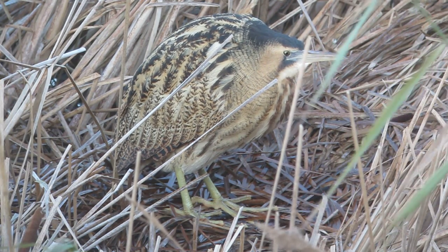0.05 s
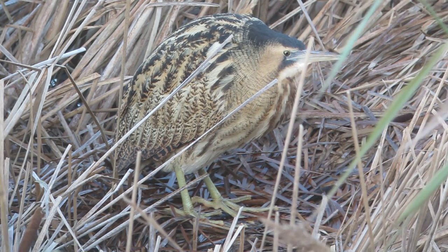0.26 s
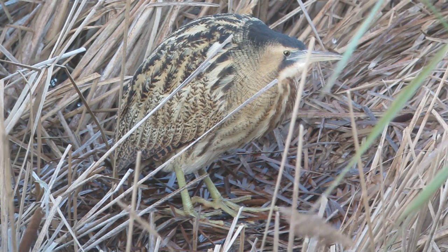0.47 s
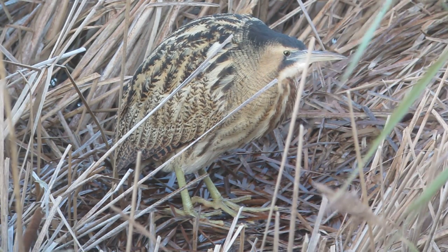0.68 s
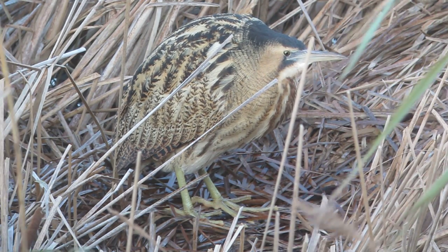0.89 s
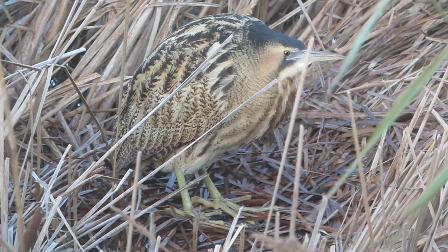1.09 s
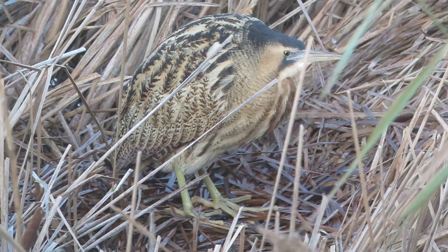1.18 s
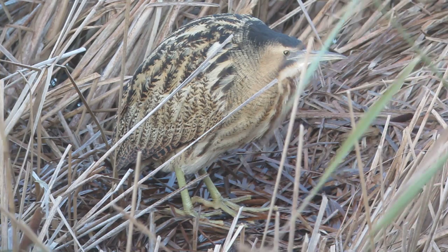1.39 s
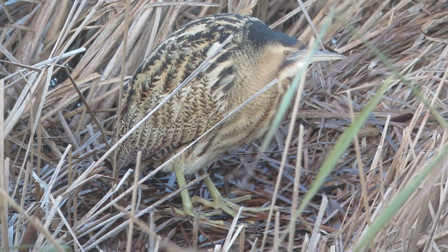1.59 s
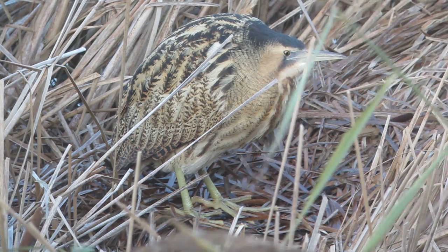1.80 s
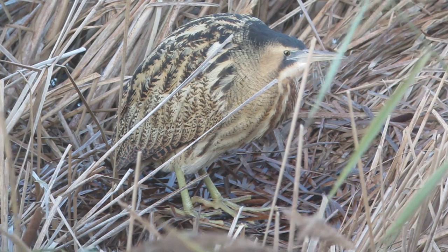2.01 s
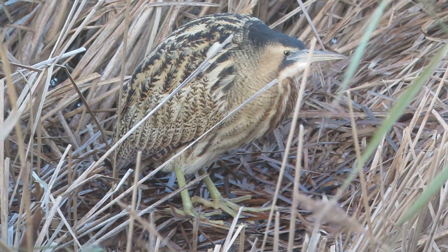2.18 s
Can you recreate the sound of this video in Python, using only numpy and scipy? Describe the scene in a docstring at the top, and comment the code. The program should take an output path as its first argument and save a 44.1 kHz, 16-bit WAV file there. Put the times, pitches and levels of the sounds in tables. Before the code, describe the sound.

Wind gusts buffet the microphone with a low rumble and soft thumps, mostly on the right, then die down. Behind them a reed bed hisses faintly, with light rustles of dry leaves and a few tiny stem ticks.

```python
"""Gusts in a reed bed buffet the two ports of a camera microphone, mostly the right one, then die down.
Their turbulent pressure is heard as a low rumble, single eddies as thumps. Behind it far wind murmurs
and the reeds hiss; dry leaves brush and squeak by friction, stems tick in their high modes, and a thin
far whistle sounds at the end. The recorder whines faintly, just above a narrow notch in its treble."""
import sys
import numpy as np
from scipy.fft import rfft, irfft, next_fast_len
from scipy.io import wavfile
from scipy.ndimage import uniform_filter1d, map_coordinates

SR = 44100
rng = np.random.default_rng(int(sys.argv[2]) if len(sys.argv) > 2 else 0)


def inscribe(sig):
    """Save sig as 16-bit PCM at rate SR to the path in sys.argv[1].

    A 1-D sig is mono; a 2-D sig holds one channel per row.
    Samples are clipped to [-1, 1] before scaling.
    """
    pcm = np.round(np.clip(np.atleast_2d(sig).T, -1, 1) * 32767)
    wavfile.write(sys.argv[1], SR, pcm.astype(np.int16))


N = 99225
LEAF_COHERENCE = 0.25  # between left and right


def amp(db):
    """Amplitude ratio of a level in decibels."""
    return 10 ** (np.asarray(db) / 20)


def unit(x):
    """Normalisation to rms 1."""
    return x / np.sqrt(np.mean(x ** 2) + 1e-20)


def along(points, hz):
    """Interpolation of (f/Hz, value) points on a logarithmic frequency axis."""
    f, values = np.transpose(points)
    return np.interp(np.log(hz + 1), np.log(f + 1), values)


def clock():
    """Sample times t/s."""
    return np.arange(N) / SR


def curve(points):
    """Linear interpolation of (t/s, value) points."""
    return np.interp(clock(), *np.transpose(points))


def wobble(rate):
    """Smooth random modulation: a spline through `rate` Gaussian values a second."""
    return map_coordinates(rng.standard_normal(N // 8), [clock() * rate], mode="wrap")


def filtered(x, response):
    """Linear filtering: the spectrum is multiplied by a frequency response."""
    size = next_fast_len(N + SR // 2)
    return irfft(rfft(x, size) * response(np.fft.rfftfreq(size, 1 / SR)), size)[..., :N]


def noise(gain, coherence, left_db=0):
    """Partly coherent stereo noise of rms 1; coherence is a number or (f/Hz, value) points."""
    def mid_side_gain(hz):
        correlation = along(coherence, hz) if np.ndim(coherence) else np.full_like(hz, coherence)
        angle = np.arccos(np.clip(correlation, -1, 1)) / 2
        return gain(hz) * [np.cos(angle), np.sin(angle)]
    mid, side = filtered(rng.standard_normal((2, N)), mid_side_gain)
    return unit(np.array([(mid + side) * amp(left_db), mid - side]))


def colour(points):
    """Frequency response through (f/Hz, level/dB) points."""
    return lambda hz: amp(along(points, hz))


def resonant(modes):
    """Modal response: a sum of Lorentzian peaks (f/Hz, width/Hz, level/dB)."""
    return lambda hz: sum(amp(db) / (1 + (2 * (hz - centre) / width) ** 2) for centre, width, db in modes)


def swell(peak_s, rise_s, fall_s):
    """Exponential growth to a peak, then exponential decay."""
    t = clock() - peak_s
    return np.exp(-np.maximum(-t / rise_s, t / fall_s))


def marsh_wind():
    """Distant turbulence murmurs; its coherence between the ports falls with frequency."""
    # strength of the murmur (t/s, level/dB)
    levels = [(0, -53), (1.2, -54), (1.8, -52), (2.25, -49.5)]
    # its spectrum (f/Hz, relative level/dB)
    spectrum = [(12, -28), (30, 0.5), (60, 3), (90, -3.5), (130, -2.5), (185, -5.5), (265, -5), (450, -12),
                (800, -15.5), (1500, -23.5), (3000, -36), (8000, -72)]
    # likeness of left and right (f/Hz, coherence)
    coherence = [(50, 1), (300, 0.76), (800, 0.76), (2000, 0.36)]
    return noise(colour(spectrum), coherence) * amp(curve(levels) + 0.41 * wobble(13.3))


def reed_hiss():
    """The reeds hiss as broadband noise, almost incoherent between the ports."""
    # spectrum of the hiss (f/Hz, relative level/dB)
    spectrum = [(100, -1), (1000, 1.5), (2000, -.5), (3200, -1.5), (5000, -4), (7000, -5), (9200, -2),
                (10300, 0.5), (11800, -4), (15500, -8.5)]
    # its nearly even strength (t/s, level/dB)
    levels = [(0, -55), (.3, -53.5), (1.0, -54.5), (1.5, -54.5), (2.25, -54.5)]
    return noise(colour(spectrum), coherence=0.03, left_db=1.7) * amp(curve(levels))


def far_whistle():
    """One note, perhaps a bird's, is modulated in frequency and amplitude on its way through the wind."""
    start_s, end_s, fade_s = 2.025, 2.24, 0.014
    gate = np.clip(np.minimum(clock() - start_s, end_s - clock()) / fade_s, 0, 1)
    pitch_hz = 1745 + 61.4 * wobble(240)
    note = np.sin(2 * np.pi * np.cumsum(pitch_hz) / SR)
    flutter_db = 4 * np.array([wobble(60), wobble(60)])
    return amp(-63) * gate * unit(note * amp(flutter_db))


def leaf_squeak():
    """Sliding friction makes one leaf ring faintly at two resonances."""
    # leaf resonances (f/Hz, width/Hz, relative level/dB)
    modes = [(3580, 540, -1), (7000, 280, -5)]
    return amp(-56) * swell(0.568, rise_s=0.027, fall_s=0.021) * noise(resonant(modes), LEAF_COHERENCE)


def stem_ticks():
    """Brief slips excite the high modes of dry stems, which decay exponentially."""
    # slips (t/s, level/dB, relative level of the upper modes/dB)
    ticks = [(.315, -52.5, -14), (1.099, -40, -26), (1.119, -51, -16), (1.459, -46, -4), (1.478, -56, -7),
             (1.555, -77, -3), (1.655, -54, -21)]
    # stem resonances, lower and upper group (f/Hz, width/Hz, relative level/dB)
    lower_modes = [(10110, 240, 5), (10440, 240, -15), (10800, 600, -5)]
    upper_modes = [(14480, 100, -3), (15010, 200, -4)]
    lower = noise(resonant(lower_modes), coherence=0.36, left_db=4.5)
    upper = noise(resonant(upper_modes), coherence=0.36, left_db=4.5)
    return sum(amp(db) * swell(peak_s, rise_s=0.0025, fall_s=0.0092) * (lower + amp(upper_db) * upper)
               for peak_s, db, upper_db in ticks)


def leaf_rustle():
    """Friction noise swells with each brush, with a fine crinkle above and a low thud below."""
    # brushes (t/s, level/dB, rise/s, fall/s, relative crinkle level/dB, relative thud level/dB)
    brushes = [(.402, -53.5, 0.0067, .009, -6, -20), (.555, -55, 0.035, .025, -18, -21),
               (.59, -62, .02, .035, 7, -20), (.815, -54, 0.019, 0.023, -18, -20),
               (1.108, -46, 0.015, 0.033, -3, -5.5), (1.36, -55.5, .04, 0.082, -11, -4.5),
               (1.468, -54.5, 0.021, 0.032, -3, -18), (1.555, -55, 0.023, 0.048, -8, -6),
               (1.844, -47.5, .02, 0.024, -4, -2.5), (1.95, -59.5, 0.028, .04, -15, -12)]
    # spectra of the friction and the crinkle (f/Hz, relative level/dB)
    friction_spectrum = [(300, 3.5), (700, -3), (1400, 1), (2000, -1.5), (2700, 0), (3600, -5), (4800, -13),
                         (6200, -11), (6900, -7), (7600, -9.5), (9200, -10), (12000, -15), (15500, -26)]
    crinkle_spectrum = [(3000, -4), (7000, -18), (10200, 2), (11800, -2), (13300, -1), (15500, -3)]
    # low thud under the brushes, perhaps from touching the camera (f/Hz, width/Hz, relative level/dB)
    thud_modes = [(253, 150, -5.5), (1356, 76, -11.5)]
    grain_db, grains_per_s = 2, 800
    friction, crinkle, thud = (
        unit(noise(gain, LEAF_COHERENCE, left_db=-0.2) * amp(grain_db * wobble(grains_per_s)))
        for gain in (colour(friction_spectrum), colour(crinkle_spectrum), resonant(thud_modes)))
    out = np.zeros((2, N))
    for peak_s, db, rise_s, fall_s, crinkle_db, thud_db in brushes:
        texture = friction + amp(crinkle_db) * crinkle + amp(thud_db) * thud
        out += amp(db) * swell(peak_s, rise_s, fall_s) * texture
    return out


def eddies():
    """A passing eddy is a pressure pulse between two suctions; skew and arrival differ at each port."""
    # eddies striking the ports (t/s, left level/dB, right level/dB, width/ms)
    strikes = [(0.255, -50, -18, 4.1), (.325, -27, -19, 4.7), (0.404, -42, -19, 1.15),
               (0.487, -32, -14.5, 1.3), (0.522, -38, -18.5, 2.64), (.546, -41, -19, 4.2),
               (0.862, -17, -40, 3), (.866, -32, -13, 1.22), (0.876, -23, -10.5, 1.9),
               (.941, -51, -19, 2.3), (1.123, -37, -21, 2.2), (1.149, -49, -26, 1.9),
               (1.343, -30, -60, 5.9), (1.646, -34.5, -46, 5.8)]
    out = np.zeros((2, N))
    for centre_s, left_db, right_db, width_ms in strikes:
        shift, skew = 0.5 * rng.standard_normal((2, 2, 1))
        u = (clock() - centre_s) * 1000 / width_ms + shift  # time in pulse widths
        out += amp([[left_db], [right_db]]) * (1 - u ** 2 + skew * u) * np.exp(-u ** 2 / 2)
    return out


def buffeting():
    """Turbulent pressure fluctuations rumble at each port in proportion to the wind pressure there."""
    # turbulence spectra; the sheltered left port is duller (f/Hz, relative level/dB)
    left_spectrum = [(10, -22), (22, -2), (42, -0.5), (80, -4.5), (120, -9), (170, -20), (250, -25.5),
                     (400, -35.5), (800, -67), (2000, -100)]
    right_spectrum = [(10, -22), (24, -3.5), (45, 3), (85, -2), (115, -9), (170, -11), (250, -21),
                      (400, -38.5), (800, -62), (2000, -100)]
    # wind pressure on each port (t/s, level/dB)
    left_wind = [(0, -50), (.1, -52.5), (.19, -34), (.27, -42.5), (.335, -35), (.38, -38.5), (.5, -36),
                 (.58, -34), (.7, -40.5), (.8, -40), (.86, -22.5), (.91, -34), (.97, -54), (1.08, -44),
                 (1.13, -43), (1.19, -46.5), (1.3, -47.5), (1.35, -42.5), (1.41, -46.5), (1.58, -58),
                 (1.64, -46.5), (1.71, -63), (2.25, -65)]
    right_wind = [(0, -45), (.08, -58), (.125, -36.5), (.2, -36.5), (.245, -26.5), (.29, -39),
                  (.325, -30.5), (.37, -41), (.44, -39.5), (.475, -24), (.51, -29.5), (.57, -28.5),
                  (.61, -47), (0.647, -26.5), (.7, -40), (0.799, -32.5), (.85, -28.5), (.875, -14.5),
                  (.94, -35.5), (.97, -36), (1.085, -38.5), (1.119, -18.5), (1.154, -27.5), (1.19, -53),
                  (1.3, -54), (2.25, -69)]
    white = noise(np.ones_like, coherence=0.22)
    flow = filtered(white, lambda hz: amp([along(left_spectrum, hz), along(right_spectrum, hz)]))
    running_power = np.abs(uniform_filter1d(flow ** 2, size=2600, axis=1))
    even_flow = flow / np.sqrt(running_power + 1e-12)
    flutter_db = 4
    return even_flow * amp([curve(wind) + flutter_db * wobble(30.32) for wind in (left_wind, right_wind)])


def scene():
    """Superposition of the wind on the ports and the sounds of the reed bed."""
    return (buffeting() + eddies() + marsh_wind() + reed_hiss()
            + leaf_rustle() + leaf_squeak() + stem_ticks() + far_whistle())


def record(dry):
    """The recorder acts as a notch filter, adds a frequency-modulated whine and limits the band."""
    # treble response of the recorder (f/Hz, gain/dB)
    notch = [(7000, 1), (7600, -5.5), (7900, -11.5), (8120, -54), (8400, -45), (8520, -33), (8750, -4),
             (9100, -5)]
    whine_hz, cutoff_hz = 8804 + 14.2 * wobble(50), 15720
    whine = amp(-73.5) * unit(np.sin(2 * np.pi * np.cumsum(whine_hz) / SR))
    return filtered(filtered(dry, colour(notch)) + whine, lambda hz: hz < cutoff_hz)


dry = scene()
out = record(dry)
inscribe(out)
```